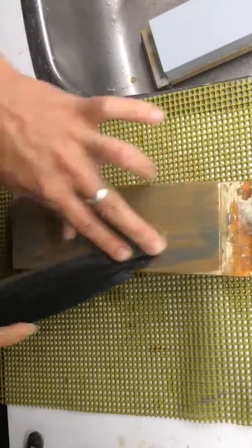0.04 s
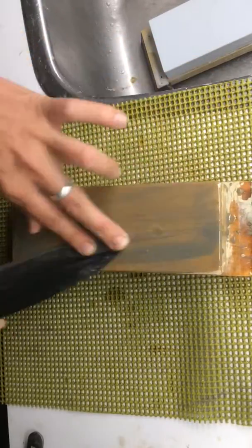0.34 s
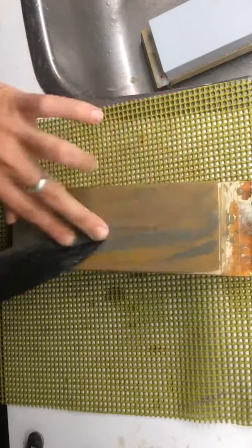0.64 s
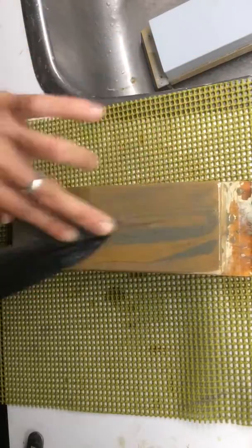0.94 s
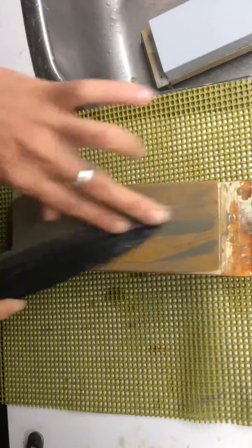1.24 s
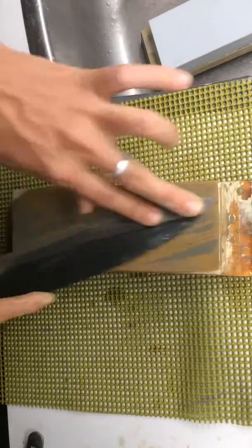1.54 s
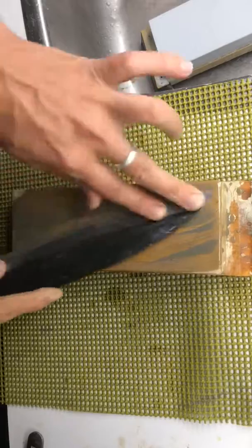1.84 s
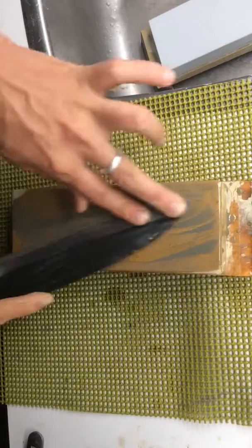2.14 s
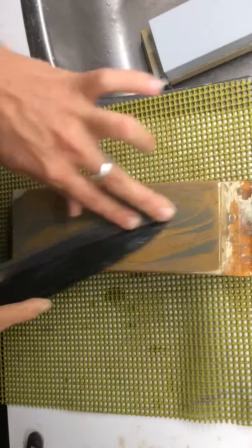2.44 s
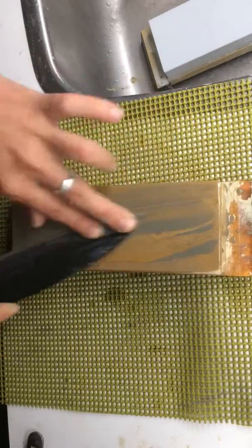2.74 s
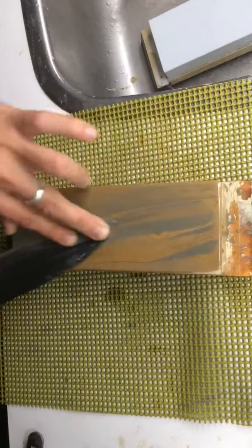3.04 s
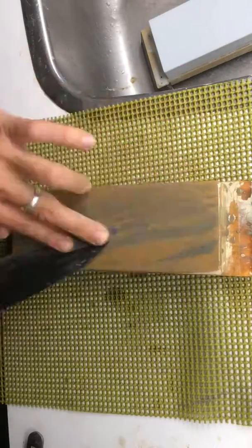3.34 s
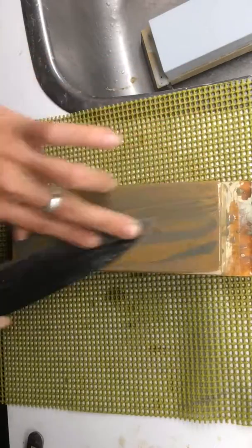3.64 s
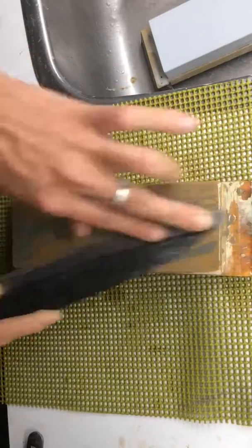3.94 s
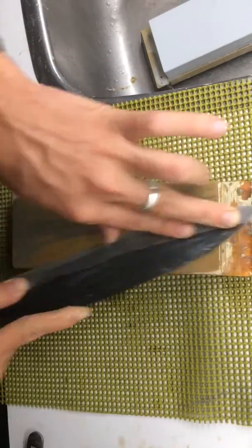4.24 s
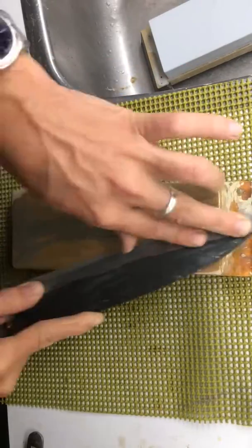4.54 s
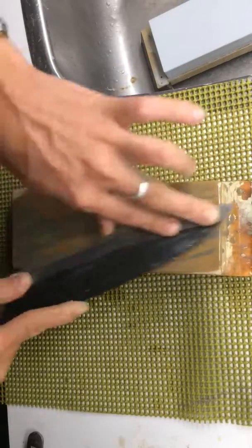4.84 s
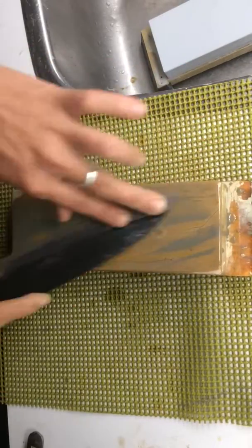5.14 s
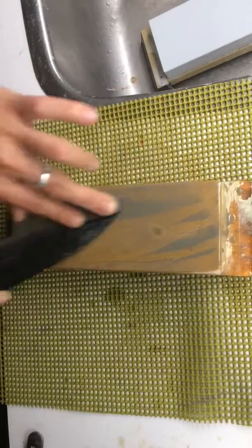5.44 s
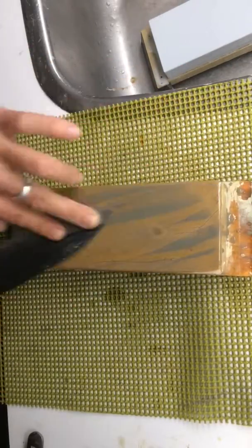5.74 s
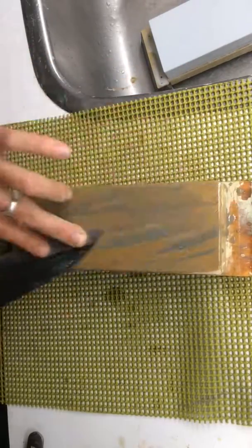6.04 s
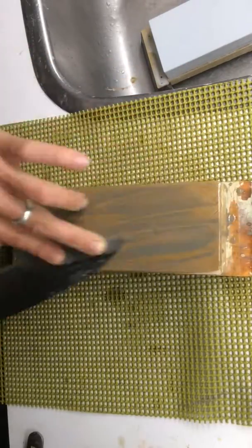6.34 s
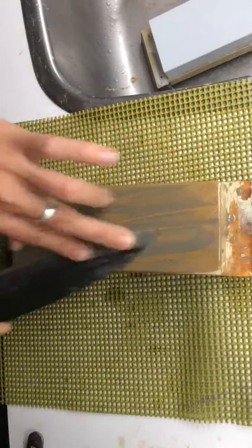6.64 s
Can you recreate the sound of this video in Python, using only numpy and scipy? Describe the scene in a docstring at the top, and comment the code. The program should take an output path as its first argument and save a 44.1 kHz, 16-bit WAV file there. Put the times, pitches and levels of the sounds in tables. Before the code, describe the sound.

Close, quick and even, a blade slides back and forth over a wet sharpening stone, its sandy scrape marked by a soft thud each time it turns. Early on, deep bumps come from the steel sink beside it, and then the edge bites and rasps twice. The bumps thin out while the scraping and knocking carry on, with brief wet squeaks and tiny ticks above a low kitchen hum.

```python
"""Over a quiet kitchen hum, a knife works a wet whetstone on a mat beside a steel sink, three round trips
a second. From the start grit rings the blade, louder the farther the arm reaches; at each turn the edge
stops and the stone rocks and knocks, while the slurry squeaks and ticks here and there. The sink booms
under the load, hardest between one and two seconds in. Just after that the edge bites deep and rasps
twice. The booms thin out, and the second half carries on with strokes, knocks and small squeaks."""
import sys
import numpy as np
from scipy import signal
from scipy.fft import rfft, irfft, next_fast_len
from scipy.io import wavfile
from scipy.ndimage import uniform_filter1d, map_coordinates

SR = 44100
rng = np.random.default_rng(int(sys.argv[2]) if len(sys.argv) > 2 else 0)


def dump(signal):
    """Clip the signal to [-1, 1] and save it as 16-bit WAV at the path in sys.argv[1]."""
    limited = np.clip(np.atleast_2d(signal).T, -1, 1)
    pcm = np.round(limited * 32767).astype(np.int16)
    wavfile.write(sys.argv[1], SR, pcm)


N = 299439

# The blade's resonances in four groups, bend, sing, ring and sheen:
# (pitch [Hz], width [Hz], relative level [dB])
BLADE_BEND_MODES = [(3840, 740, 2), (3994, 220, 6.5), (4285, 430, -3.5)]
BLADE_SING_MODES = [(2863, 340, -8), (4485, 164, -2)]
BLADE_RING_MODES = [(6170, 660, -13), (7010, 340, 0.5), (7520, 210, -.5), (7927, 130, 0.5)]
BLADE_SHEEN_MODES = [(9450, 550, 0), (13140, 2100, -2.5)]
# EQ of the sandy hiss: (frequency [Hz], relative level [dB])
SAND_EQ = [(300, -15), (1000, -6), (2300, -11.5), (3500, -3.5), (5200, -1.5), (9000, 2.5), (10300, -3),
           (13400, 3), (14100, -9)]


def scrape(judder_db=1.03):
    """Grit rings the blade and hisses on the stone with every stroke; finger pressure rides it all."""
    motion = strokes()
    stroke, reach, *_ = motion
    bend = swing(motion, db=-75, reach_db=5.5, pull_db=-0.9, lean_db=0,
                 glide_db=-8, stall_db=-3.5, bite_db=0)
    ring = swing(motion, db=-70.5, reach_db=2.2, pull_db=0.3, lean_db=4.5,
                 glide_db=-3, stall_db=-4.5, bite_db=1.5)
    hiss = swing(motion, db=-72, reach_db=4, pull_db=1.25, lean_db=5,
                 glide_db=-0.75, stall_db=-6, bite_db=3)
    sing = undb(-2.5) * np.sqrt(bend * hiss)
    blade = (bend * rubbed(BLADE_BEND_MODES, reach, flicker_db=1.5, flicker_hz=45)
             + sing * rubbed(BLADE_SING_MODES, reach, flicker_db=2.5, flicker_hz=58)
             + ring * rubbed(BLADE_RING_MODES, reach, flicker_db=2.6, flicker_hz=51)
             + undb(-7.5) * hiss * rubbed(BLADE_SHEEN_MODES, reach, flicker_db=2.5, flicker_hz=47))
    sand = hiss * unit(colour(grit(spread_db=4), SAND_EQ))
    stone = undb(-11) * hiss * unit(stone_body(grit(spread_db=2.5)))
    return (blade + sand + stone) * undb(pressure(stroke) + judder_db * walk(130))


def rubbed(modes, reach, flicker_db, flicker_hz, detune=0.01158):
    """Grit drives each blade mode; its level wavers and its pitch rises as the contact moves along."""
    ring = np.zeros(N)
    for hz, width, db in modes:
        gain = undb(db + flicker_db * walk(flicker_hz))
        ring += gain * resonate(resonate(grit(spread_db=5.4), hz, 0.71 * width), hz, 4 * width)
    speed = 1 + detune * (reach - 0.5)
    return unit(map_coordinates(ring, [np.cumsum(speed)], mode="mirror"))


def strokes(stall_s=0.015, stall_lag_s=0.0052, bite_s=0.028):
    """The gesture: stroke count (even = push, odd = pull), then arm reach, stall and bite, each 0-1."""
    t = np.arange(N) / SR
    turns = np.pad(np.array(HAND_TURNS)[:, 0], 1, "reflect", reflect_type="odd")
    stroke = np.interp(t, turns, np.arange(len(turns)) - 1)
    reach = np.sin(np.pi * stroke / 2) ** 2
    from_turn = t - turns[np.round(stroke).astype(int) + 1]
    stall = np.exp(-((from_turn - stall_lag_s) / stall_s) ** 2)  # the edge stops just after the knock
    bite = np.sin(np.pi * np.clip(from_turn / bite_s, 0, 1))  # and digs in as it sets off again
    return stroke, reach, stall, bite


def swing(motion, db, reach_db, pull_db, lean_db, glide_db, stall_db, bite_db):
    """A layer's fader: it follows reach, pull and lean, sags in the glide, ducks at stalls, then bites."""
    stroke, reach, stall, bite = motion
    pulling, progress = np.floor(stroke) % 2, stroke % 1
    glide = np.sin(np.pi * progress)  # fastest on the slurry at mid-stroke
    arm_db = db + reach_db * reach + pull_db * pulling + lean_db * progress
    return undb(arm_db + glide_db * glide + stall_db * stall + bite_db * bite)


# Finger pressure, stroke by stroke: (weight [dB], rise along the stroke [dB])
STROKE_ACCENTS = [(6.5, -25), (-1, -1), (-0.5, -2), (2.5, -1), (2, -0.5), (1, 0), (1.5, -4.5), (0, 1.5),
                  (2, 3), (0.5, 3.5), (2.5, 3.5), (0, -3), (1.5, -8), (-0.5, -6), (0, -3), (0, -6),
                  (0.5, 6), (1.5, -2), (1.5, 0.5), (3, -3.5), (2.5, -3), (1.5, -1), (2.5, -0.5), (1, -7),
                  (0.5, 3.5), (1.5, -3), (1, 2), (3, -6), (1, -2.5), (2, -8), (1, 4), (1.5, -12), (2.5, -1),
                  (3, -6), (1, -4), (-3, -7), (0.5, 5), (-0.5, -1), (1, 2.5), (0.5, -8), (0.5, 2.5)]


def pressure(stroke):
    """Finger pressure in dB: each stroke has its own weight and leans in or eases off on the way."""
    row = np.clip(np.floor(stroke).astype(int) + 1, 0, len(STROKE_ACCENTS) - 1)
    weight_db, lean_db = np.array(STROKE_ACCENTS)[row].T
    return uniform_filter1d(weight_db + lean_db * (stroke % 1 - 0.5), size=1900)


# Body tone of the stone and its base: (pitch [Hz], width [Hz], relative level [dB])
STONE_MODES = [(488, 82, 6), (670, 113, -0.5), (956, 24, 2.5), (1335, 95, 0.5), (1708, 7, 3.5),
               (2028, 27, -1.5)]


def stone_body(x):
    """The stone and its wooden base colour whatever shakes them."""
    return sum(undb(db) * resonate(x, hz, width) for hz, width, db in STONE_MODES)


# Turns of the hand, the first into a push: (time [s], thud accent [dB], hard contact accent [dB])
HAND_TURNS = [(0.059, -40.5, -56), (0.226, -44, -79), (0.393, -44, -60), (0.57, -54, -73),
              (0.74, -37.5, -55.5), (0.908, -41.5, -59.5), (1.081, -41, -56), (1.255, -39, -54),
              (1.418, -44, -56.5), (1.591, -41, -58), (1.762, -39, -53.5), (1.931, -41.5, -57.5),
              (2.095, -37.5, -59.5), (2.259, -38.5, -74), (2.421, -39.5, -59.5), (2.609, -42.5, -70),
              (2.775, -41, -78), (2.946, -42, -73), (3.116, -41, -61.5), (3.286, -38.5, -70),
              (3.438, -39.5, -55), (3.619, -41, -69), (3.788, -38.5, -56.5), (3.963, -39.5, -56.5),
              (4.134, -37.5, -58.5), (4.298, -43.5, -70), (4.461, -37, -56.5), (4.631, -39, -60.5),
              (4.806, -38, -66), (4.969, -46.5, -63.5), (5.14, -41, -83), (5.309, -44, -66),
              (5.478, -45, -82), (5.644, -42.5, -57), (5.805, -42, -61), (5.975, -42, -56),
              (6.135, -39.5, -64), (6.308, -38, -59.5), (6.462, -39.5, -61), (6.635, -41, -58.5)]


def knocks(tap_hz=145, slump_hz=80, sway_hz=71, rebound_s=0.01218, lead_s=0.005):
    """At each turn the stone sinks into its mat and tips: a round thud, a dull clack, a short rattle."""
    t = np.arange(SR // 3) / SR
    thuds, clack_env, click_env, rattle_env = np.zeros((4, N))
    for k, (s, thud_db, contact_db) in enumerate(HAND_TURNS):
        tap = undb(thud_db) * rock(t, tap_hz * (1 + 0.085 * rng.standard_normal()))
        slump = undb(thud_db - 3.5) * rock(t, slump_hz * (1 + 0.26 * rng.standard_normal()))
        add(rattle_env, s, undb(thud_db - 16) * fade(t, 0.0028, 0.083))
        if k % 2:  # a push ends with a light click of the edge and one thud
            add(click_env, s, undb(contact_db - 1) * fade(t, 0.0003, 0.025))
            add(clack_env, s, undb(contact_db - 2.5) * fade(t, 0.002, 0.072))
            add(thuds, s, tap)
            add(thuds, s - lead_s, slump)
        else:  # a pull ends softly: the stone slumps, settles again and sets the sink swaying
            add(clack_env, s - lead_s, undb(contact_db - 7.5) * fade(t, 0.0031, 0.33))
            add(thuds, s, undb(-4) * tap - slump)
            add(thuds, s + rebound_s, undb(-6.5) * tap)
            sway = np.sin(2 * np.pi * sway_hz * t) * fade(t, 0.025, 0.21)
            add(thuds, s, undb(thud_db - 6.5) * sway)
    clack = unit(stone_body(noise()))
    click = unit(resonate(resonate(noise(), 1350, 1200), 1200, 4300))
    rattle = unit(resonate(resonate(noise(), 252, 73), 350, 450))
    return thuds + clack_env * clack + click_env * click + rattle_env * rattle


def rock(t, hz):
    """One rock of the stone: the mat swallows it in a cycle and a half and leaves a weak tail."""
    cycles = hz * t
    punch = np.exp(-((cycles - 0.75) / 0.77) ** 2)
    tail = undb(-12.5) * fade(t, 0.015, 0.15)
    return np.sin(2 * np.pi * cycles) * (punch + tail)


# Deep bites at the far end of two round trips: (start [s], length [s], level [dB], grate pitch [Hz])
RASP_CUES = [(2.166, 0.23, -64.5, 2570), (2.48, 0.22, -65.5, 1860)]
# EQ of the dark grind under them: (frequency [Hz], relative level [dB])
GRIND_EQ = [(120, -15), (220, -6), (265, -3), (400, -3.5), (490, -5.5), (800, -7), (1600, -15.5),
            (3000, -34)]


def rasps(chatter_db=-1.4, grate_db=-6.5, grate_width_hz=900, attack_s=0.022, release_s=0.07):
    """Coarse grinding shakes the stone and grates on the edge: it swells, holds and lets go."""
    out, t = np.zeros(N), np.arange(N) / SR
    body = unit(stone_body(grit(spread_db=8)))
    body += undb(0.5) * unit(colour(grit(spread_db=11.5), GRIND_EQ))
    for s, length, db, hz in RASP_CUES:
        attack = (t - s) / attack_s
        release = (s + length - t) / release_s + 0.5
        envelope = np.clip(np.minimum(attack, release), 0, 1)
        grate = band(grit(spread_db=7.5), hz, grate_width_hz, 2 * grate_width_hz)
        out += undb(db) * envelope * (body + undb(grate_db) * grate)
    return out * undb(chatter_db * walk(59))


# Bright zings of the catching edge: (peak time [s], level [dB], pitch [Hz])
CATCH_CUES = [(0.895, -69, 4000), (1.575, -76, 4130), (1.672, -73, 4200), (4.955, -71, 4200),
              (5.37, -71, 4050), (6.285, -87, 4100), (6.59, -73, 4360)]


def catches(swell_s=0.032, width_hz=600):
    """The edge catches on coarser grit, and one resonance of the blade flares for a moment."""
    out, t = np.zeros(N), np.arange(N) / SR
    for s, db, hz in CATCH_CUES:
        ring = band(grit(spread_db=3), hz, width_hz, 2 * width_hz)
        out += undb(db) * ring * np.exp(-((t - s) / swell_s) ** 2)
    return out


# Chirps of the wet edge: (peak time [s], level [dB], pitch [Hz], half-length [s], roughness [1 = no tone])
SQUEAK_CUES = [(0.061, -67.5, 1385, 0.049, 0.2), (0.731, -61.5, 1397, 0.025, 0.35),
               (1.08, -69, 1414, 0.059, 0.23), (1.42, -68, 1450, 0.043, 0.9),
               (2.527, -63, 1750, 0.022, 0.1), (2.585, -63.5, 1750, 0.045, 0.5),
               (2.801, -59.5, 1385, 0.0087, 0.07), (3.791, -69.5, 1503, 0.085, 0.54),
               (4.128, -65, 1430, 0.044, 0.42), (4.469, -67, 1457, 0.044, 0.3),
               (4.802, -73.5, 1500, 0.035, 1.1)]


def squeaks(width_hz=200, skirt_hz=650, smear_db=-9, waver=0.01224, upper_hz=1820, upper_db=-5):
    """The slow blade sticks and slips: a wavering tone breaks into chatter and wakes a higher ring."""
    out, t = np.zeros(N), np.arange(N) / SR
    smear = undb(smear_db) * unit(stone_body(noise()))
    upper = undb(upper_db) * band(noise(), upper_hz, width_hz, skirt_hz)
    slips = undb(2.7 * walk(140))
    wavering_time = np.cumsum(1 + waver * walk(130)) / SR
    for s, db, hz, half_length, rough in SQUEAK_CUES:
        rough = np.clip(rough, 0, 1)
        tone = np.sqrt(1 - rough) * unit(np.sin(2 * np.pi * hz * wavering_time))
        chatter = np.sqrt(rough) * (band(noise(), hz, width_hz, skirt_hz) + upper) * slips
        swell = np.exp(-2 * ((t - s) / half_length) ** 2)
        out += undb(db) * (tone + chatter + smear) * swell
    return out


# Slurry bubbles snapping under the edge: (time [s], relative level [dB])
BUBBLE_CUES = [(.281, -63), (.618, -62), (4.016, -62), (4.347, -62), (4.693, -63)]
# Coarse grains cracking under the edge: (time [s], level [dB], pitch [Hz])
GRAIN_CUES = [(0.827, -58.5, 2150), (1.543, -56.5, 2920), (2.26, -51.5, 1990), (3.128, -56.5, 6600),
              (4.631, -53.5, 2920), (5.648, -61, 2640)]


def ticks(bubble_hz=6020, glide=0.28):
    """A bubble is a short ping that rises a little; a cracking grain is a dry burst around its pitch."""
    out, t = np.zeros(N), np.arange(SR // 10) / SR
    ping = np.sin(2 * np.pi * bubble_hz * t * (1 + glide * t)) * fade(t, 0.00075, 0.017)
    for s, db in BUBBLE_CUES:
        add(out, s, undb(db + 7) * ping)
    for s, db, hz in GRAIN_CUES:
        burst = band(noise(len(t)), hz, 0.2 * hz, hz)
        add(out, s, undb(db) * burst * fade(t, 0.0003, 0.04))
    return out


# Soft, deep bumps against the sink: (time [s], level [dB], pitch [Hz], decay t60 [s])
BUMP_CUES = [(0.0, -27.5, 51.4, 0.034), (0.532, -31, 60, 0.076), (0.587, -37, 64.5, 0.091),
             (1.099, -21, 62.2, 0.085), (1.641, -18, 58.2, 0.06), (1.688, -28, 48.5, 0.27),
             (2.222, -35, 63.8, 0.24), (3.117, -43, 62.6, 0.1), (3.383, -36.5, 60, 0.048),
             (3.451, -37, 85, 0.026)]


def bumps(overtone_ratio=2.1, overtone_db=-12):
    """Slow, heavy pushes flex the basin and make it boom."""
    out, t = np.zeros(N), np.arange(SR // 2) / SR
    for s, db, hz, t60 in BUMP_CUES:
        phase = 2 * np.pi * hz * t
        boom = np.sin(phase) + undb(overtone_db) * np.sin(overtone_ratio * phase)
        add(out, s, -undb(db) * boom * fade(t, 0.02, t60))
    return out


# Low tail of the steel basin: (pitch [Hz], decay t60 [s], relative level [dB])
SINK_MODES = [(68.38, 2.4, -19), (77.5, 0.44, -18), (119.1, 0.41, -8)]


def sink_ring(push):
    """The basin rings on after each push."""
    t = np.arange(SR) / SR
    ring = sum(undb(db) * np.sin(2 * np.pi * hz * t) * fade(t, 0.00044, t60) for hz, t60, db in SINK_MODES)
    return signal.fftconvolve(push, ring / np.abs(rfft(ring)).max())[:N]


def kitchen_echo(x, t60=0.037, wet_db=-13):
    """Counter, basin and near walls answer with a short, dense echo."""
    t = np.arange(SR // 3) / SR
    echo = noise(len(t)) * fade(t, 0.0094, t60)
    echo = signal.sosfilt(signal.butter(2, 300, "high", fs=SR, output="sos"), echo)
    return x + undb(wet_db) * signal.fftconvolve(x, echo / np.linalg.norm(echo))[:N]


# EQ of the kitchen air: (frequency [Hz], relative level [dB])
AIR_EQ = [(20, -34.5), (150, -3), (205, -14), (500, -23.5), (1000, -27), (2200, -30), (16000, -41)]


def room_tone(hum_hz=120):
    """The bed: still kitchen air, a low rumble that drifts, and the hum of an appliance."""
    air = undb(-66) * unit(colour(noise(), AIR_EQ))
    rumble = undb(-58) * unit(resonate(resonate(noise(), 53, 35), 65, 110))
    hum = undb(-60) * np.sin(2 * np.pi * hum_hz * np.arange(N) / SR + walk(20))
    return air + (rumble + hum) * undb(2 * walk(13))


def undb(db):
    """Decibels to gain."""
    return 10 ** (np.asarray(db) / 20)


def unit(x):
    """Scale to rms 1."""
    return x / np.sqrt(np.mean(x ** 2))


def add(out, s, sound):
    """Mix a sound in at time s."""
    i = max(int(s * SR), 0)
    out[i:i + len(sound)] += sound[:N - i]


def noise(samples=N):
    """White noise."""
    return rng.standard_normal(samples)


def grit(spread_db):
    """Dense tiny collisions of uneven size."""
    return unit(noise() * undb(spread_db * noise()))


def walk(rate_hz):
    """Random modulation: levels held 1 / rate_hz seconds and slewed; spread near 1."""
    steps = noise(4096)
    held = steps[(np.arange(N) * rate_hz / SR).astype(int) % len(steps)]
    return 1.2 * uniform_filter1d(held, int(SR / rate_hz))


def fade(t, rise, t60):
    """Envelope of a blow: a soft rise, then a decay; peak 1."""
    shape = (1 - np.exp(-(t / rise) ** 2)) * np.exp(-np.log(1000) * t / t60)
    return shape / shape.max()


def resonate(x, hz, width):
    """One resonance, gain 1 at its centre."""
    return signal.lfilter(*signal.iirpeak(hz, hz / width, fs=SR), x)


def band(x, hz, width, skirt):
    """A resonance with its skirts trimmed by a wider one; rms 1."""
    return unit(resonate(resonate(x, hz, width), hz, skirt))


def colour(x, points):
    """Minimum-phase EQ through the given (frequency [Hz], level [dB]) points."""
    hz, db = np.transpose(points)
    size = next_fast_len(N + SR) // 2 * 2
    bin_hz = np.arange(size // 2 + 1) * SR / size
    log_gain = np.log(undb(np.interp(np.log(bin_hz + 1), np.log(hz), db)))
    cepstrum = irfft(log_gain)[:size // 2]
    cepstrum[1:] *= 2
    return irfft(rfft(x, size) * np.exp(rfft(cepstrum, size)))[:N]


def scene(knock_send_db=-5, bump_send_db=1):
    """The mix in a small kitchen; the mat passes less into the sink than a direct bump does."""
    knocking, bumping = knocks(), bumps()
    work = scrape() + catches() + rasps() + squeaks() + ticks() + knocking + bumping
    basin = sink_ring(undb(knock_send_db) * knocking + undb(bump_send_db) * bumping)
    return (kitchen_echo(work) + basin + room_tone())[None]


def record(dry, low_hz=38, top_hz=15450):
    """Master EQ: thin the deepest bass and cut the top steeply."""
    thin = signal.sosfilt(signal.butter(2, low_hz, "high", fs=SR, output="sos"), dry)
    return signal.sosfilt(signal.ellip(10, 0.2, 80, top_hz, fs=SR, output="sos"), thin)


dry = scene()
out = record(dry)
dump(out)
```